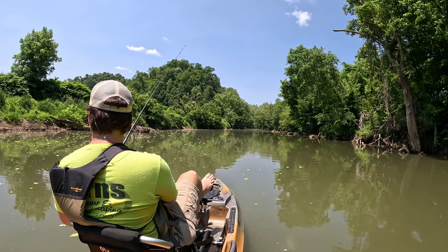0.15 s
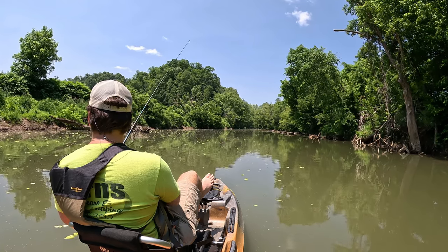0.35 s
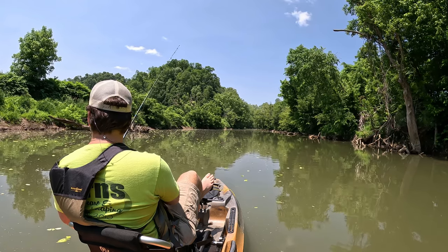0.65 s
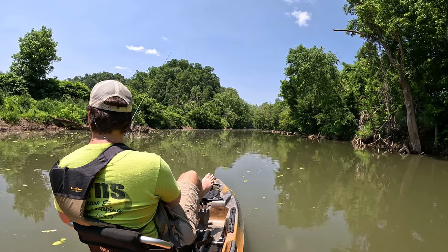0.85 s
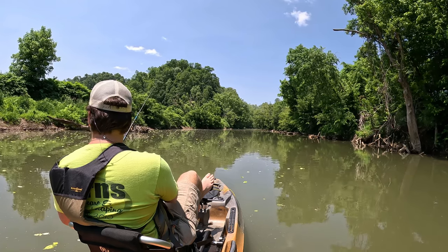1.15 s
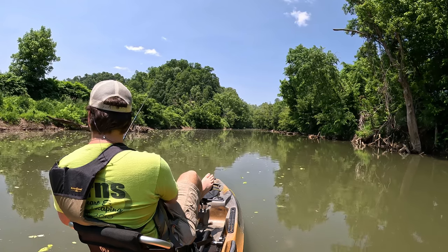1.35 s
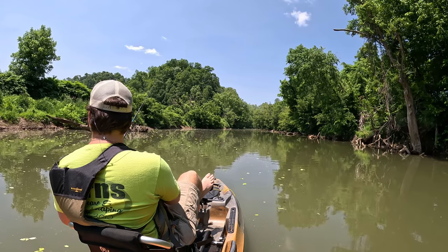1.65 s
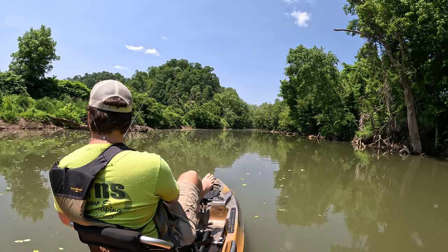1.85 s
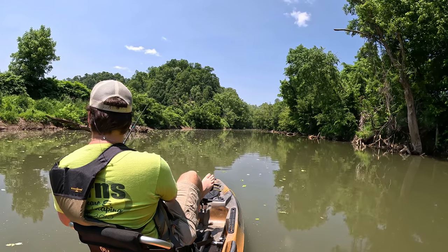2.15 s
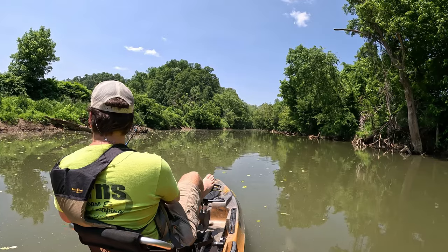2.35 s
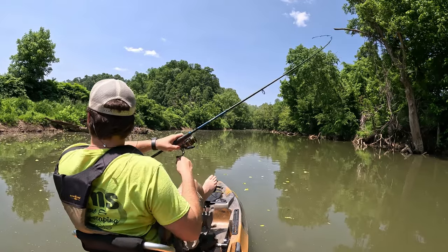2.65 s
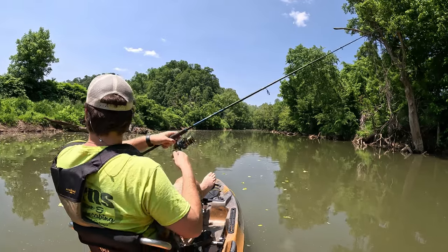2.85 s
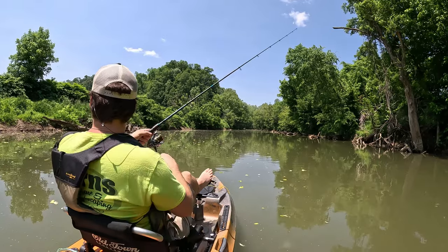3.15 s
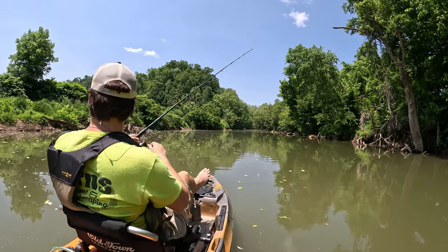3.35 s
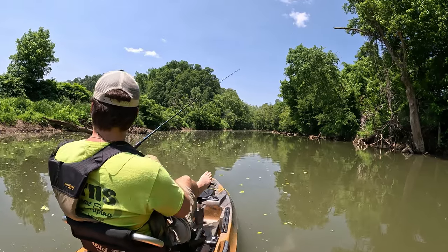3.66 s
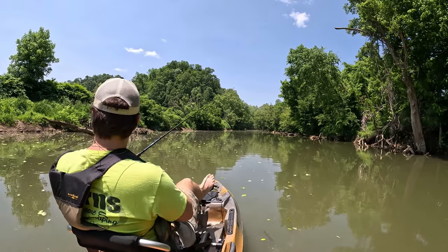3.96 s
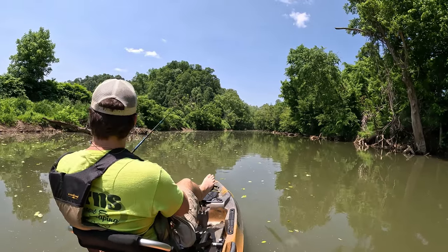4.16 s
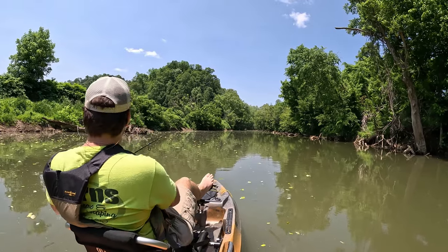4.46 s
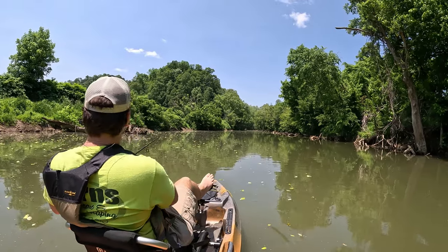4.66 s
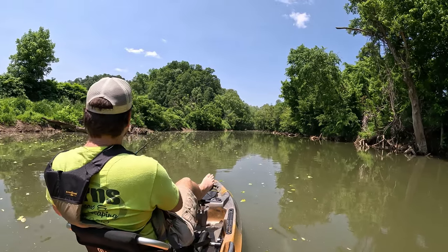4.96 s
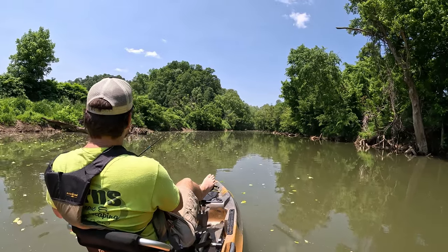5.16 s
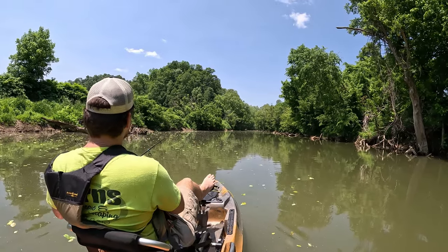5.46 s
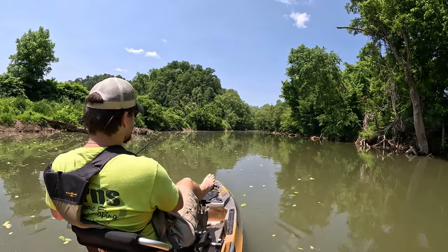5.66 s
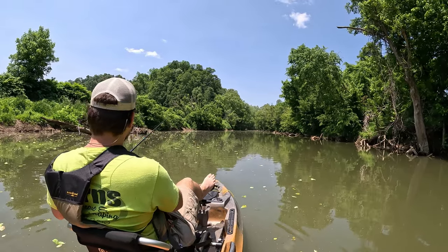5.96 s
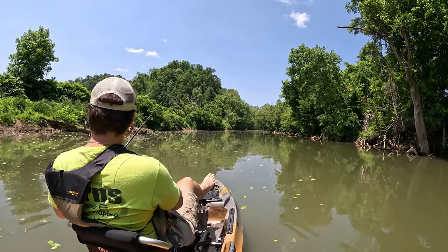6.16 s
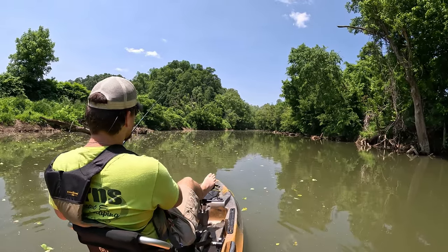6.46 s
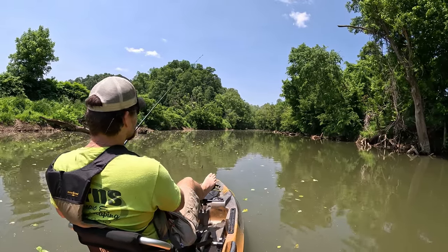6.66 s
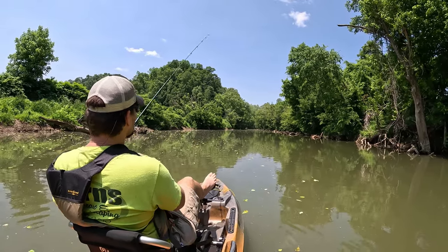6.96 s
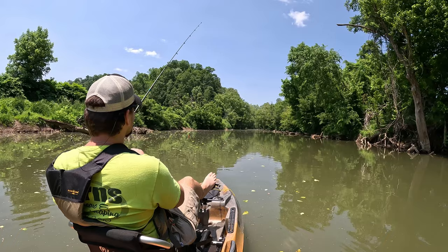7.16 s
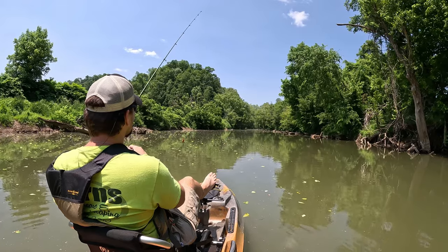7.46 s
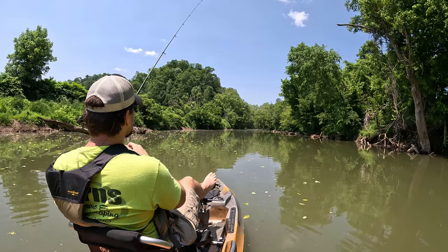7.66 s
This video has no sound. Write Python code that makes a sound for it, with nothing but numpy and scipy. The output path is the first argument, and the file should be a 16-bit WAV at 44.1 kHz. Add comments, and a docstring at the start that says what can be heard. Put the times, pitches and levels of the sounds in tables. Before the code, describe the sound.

Gear knocks and rattles on a hollow plastic kayak, with cloth rustling, one hard bang and faint birdsong.

```python
"""Fishing gear thuds and ticks on a hollow plastic kayak, heard from the hull behind the angler.
Blows ring the hull's low modes and the hardest one bounces; hard contacts snap and ring the deck shell.
As he shifts, cloth rubs and the seat creaks; the reel's gear teeth whir and its bail clicks.
Warblers sing in the trees, and the creek banks send back a short diffuse echo
over a hush of air and leaves."""
import sys
import numpy as np
from scipy import signal
from scipy.fft import rfft, irfft, next_fast_len
from scipy.io import wavfile
from scipy.ndimage import uniform_filter1d

SR = 44100
rng = np.random.default_rng(int(sys.argv[2]) if len(sys.argv) > 2 else 0)


def persist_wave(psi):
    """Save psi, clipped to +-1, as 16-bit WAV."""
    counts = np.round(np.clip(psi, -1, 1) * 32767).astype(np.int16)
    wavfile.write(sys.argv[1], SR, np.atleast_2d(counts).T)


N = 344408

# the angler shifting in his seat: start/s, strongest/s, end/s, cloth/dB, seat creak/dB
BODY_MOVES = [(2.36, 2.44, 2, -70, -110), (2.48, 2.64, 2.8, -49, -81.5), (2.8, 2.92, 3.22, -63.5, -83),
              (3.02, 3.12, 3.59, -62, -102), (3.46, 3.88, 4.18, -61.5, -116),
              (4.23, 4.46, 4.75, -60.5, -120), (4.85, 4.92, 5.17, -71.5, -122),
              (6.64, 6.76, 6.93, -86, -88.5)]


def undb(db):
    """Decibels to gain."""
    return 10 ** (np.asarray(db) / 20)


def unit(x):
    """Scale to rms 1."""
    return x / np.sqrt(np.mean(x ** 2))


def curve(table, column):
    """One column of a table, joined by straight lines in time."""
    rows = np.array(table)
    return np.interp(np.arange(N) / SR, rows[:, 0], rows[:, column])


def colour(x, points):
    """EQ through (f/Hz, gain/dB) points joined on a log axis."""
    size = next_fast_len(x.shape[-1])
    hz, db = np.transpose(points)
    bin_hz = np.arange(size // 2 + 1) * SR / size
    gain = undb(np.interp(np.log(bin_hz + 1), np.log(hz), db))
    return irfft(rfft(x, size) * gain, size)[..., :x.shape[-1]]


def ring(x, hz, t60):
    """One mode: a unit impulse starts a decaying sine of size 1."""
    r, w = np.exp(-np.log(1000) / (t60 * SR)), 2 * np.pi * hz / SR
    return signal.lfilter([0, r * np.sin(w)], [1, -2 * r * np.cos(w), r * r], x)


def walk(rate):
    """Smooth random drift, `rate` steps a second, rms 1."""
    hold = int(SR / rate)
    steps = np.repeat(rng.standard_normal(N // hold + 1), hold)
    return unit(uniform_filter1d(uniform_filter1d(steps, hold), hold)[:N])


def pair(like, length=N):
    """Stereo noise whose channels share the part `like` of their power."""
    mid, side = rng.standard_normal((2, length))
    return np.sqrt((1 + like) / 2) * mid + np.sqrt((1 - like) / 2) * side * np.array([[1], [-1]])


def add(out, s, x):
    """Mix a short sound in at time s."""
    i = int(s * SR)
    out[..., i:i + x.shape[-1]] += x[..., :max(N - i, 0)]


def grains(rate, scatter_db):
    """Dense random contacts, a few much larger than the rest; rms 1."""
    contacts = (rng.random(N) < rate / SR) * rng.choice([-1, 1], N)
    return unit(contacts * undb(scatter_db * np.minimum(rng.exponential(size=N), 5)))


def gestures(rows, column, edge_db=-10, roundness=2.84):
    """Level in dB of efforts that swell and ease off, silent between; more roundness flattens the top."""
    t, power = np.arange(N) / SR, 1e-20
    for row in rows:
        away = np.interp(t, row[:3], [1, 0, 1])
        power = power + (away < 1) * undb(row[column] + edge_db * away ** roundness) ** 2
    return 10 * np.log10(power)


def hush():
    """A bed of leaves and air; the bass laps and flickers on its own."""
    # ride of the bed: t/s, level/dB, bass swell/dB
    ride = [(0., -62.5, -2.5), (5., -63, 2), (6.5, -63.5, -4.5), (7.1, -67, 2), (7.81, -66.5, -1.5)]
    # spectrum of air and leaves: f/Hz, level/dB
    spectrum = [(25, -9), (90, -7), (170, -4), (260, -13.5), (420, -19.5), (850, -24), (1150, -17),
                (2300, -21), (4100, -25), (7000, -29), (10000, -39.5), (13000, -55), (16000, -54)]
    # stereo lean of the bed: f/Hz, left minus right/dB
    balance = [(60, -2), (200, -4.5), (700, -4), (2400, 1), (15000, -0.5)]
    hz, lean_db = np.transpose(balance)
    left, right = unit(colour(pair(0.57), spectrum))
    air = np.array([colour(left, np.c_[hz, lean_db / 2]), colour(right, np.c_[hz, -lean_db / 2])])
    bass = signal.sosfilt(signal.butter(2, 400, fs=SR, output="sos"), air)
    swell = undb(curve(ride, 2) + 1.1 * walk(5.6))
    return undb(curve(ride, 1) + 0.51 * walk(7.5)) * (air - bass + swell * bass)


def banks(x, t60, rise_ms, like):
    """Trunks and banks scatter a sound into a dense tail that builds, then dies."""
    t = np.arange(SR) / SR
    tail = pair(like, len(t)) * (1 - np.exp(-t / (rise_ms / 1000))) * np.exp(-np.log(1000) * t / t60)
    return signal.fftconvolve(x[None], tail / np.sqrt(np.sum(tail[0] ** 2)), axes=1)[:, :N]


def whistles(notes, warble):
    """Near-sine bird notes that glide through three pitches and waver a little."""
    out, waver = np.zeros(N), 1 + warble * walk(150)
    for s, length, *hz, db in notes:
        u = np.linspace(0, 1, int(length * SR))
        glide = np.polyval(np.polyfit([0, .5, 1], hz, 2), u)
        pitch = glide * waver[int(s * SR):][:len(u)]
        add(out, s, undb(db) * np.sin(np.pi * u) ** .5 * np.sin(2 * np.pi * np.cumsum(pitch) / SR))
    return out


def chatter(db=-66.5, low_hz=3930, high_hz=5720, fall_hz=1215, count=70):
    """Note list of short downward slurs, half hidden among the clear notes of the far song."""
    when, height, fall, softness = rng.random((count, 4)).T
    start_hz = low_hz + (high_hz - low_hz) * height
    end_hz = start_hz - fall_hz * (1 + fall) / 2
    middle_hz = (start_hz + end_hz) / 2
    return np.c_[.7 + 1.1 * when, np.full(count, .04), start_hz, middle_hz, end_hz, db - 6 * softness]


def warblers():
    """A far song and a near one a little to the right, both heard mostly by way of the trees."""
    # notes of the far song: t/s, length/s, start f/Hz, middle f/Hz, end f/Hz, level/dB
    far_notes = [(0.133, 0.045, 2230, 2490, 2700, -56.5), (0.551, 0.055, 2960, 2660, 2210, -58),
                 (.665, 0.03, 2880, 2660, 2080, -59.5), (0.728, 0.03, 3560, 3210, 2960, -61),
                 (0.799, 0.034, 3650, 3910, 4130, -55.5), (0.942, 0.038, 5000, 4800, 4730, -62),
                 (1.012, 0.088, 4820, 4270, 2860, -56.5), (1.15, 0.075, 3450, 3980, 3950, -54.5),
                 (1.215, 0.036, 3470, 3260, 2950, -59), (1.305, 0.0226, 3770, 3940, 4130, -53.5),
                 (1.422, 0.036, 5260, 4760, 4500, -57.5), (1.575, 0.023, 3940, 3880, 3530, -57),
                 (5.52, 0.12, 2905, 2800, 2490, -65), (4.762, 0.03, 6620, 5900, 4400, -54)]
    # notes of the near song: same columns
    near_notes = [(5.74, 0.031, 4100, 4500, 4670, -67.5), (6.39, 0.048, 6470, 7280, 8080, -64.5),
                  (6.424, 0.027, 7360, 6200, 5340, -57), (6.485, 0.12, 6200, 6990, 8400, -60.5),
                  (6.658, 0.037, 4820, 5130, 5580, -59.5), (6.743, 0.028, 4740, 4360, 3780, -55.5),
                  (6.788, 0.038, 4660, 5110, 5320, -63.5), (6.866, 0.0304, 6260, 6620, 6830, -60.5),
                  (6.903, 0.026, 6810, 4950, 3500, -60.5)]
    # the near bird's repeated motif: same columns, t/s from the motif's start
    motif = [(0., .04, 5800, 5150, 4634, 3.5), (0.042, 0.039, 5490, 6080, 6295, 3.5),
             (0.081, .055, 3870, 4378, 4676, 4)]
    # entries of the motif: t/s, level/dB
    entries = [(5.833, -66.5), (6.018, -61.5), (6.198, -62.5)]
    repeats = [(start + s, *note, db + entry_db) for start, entry_db in entries for s, *note, db in motif]
    near = whistles(near_notes + repeats, warble=.009)
    far = whistles(far_notes, warble=.014)
    near_song = undb(1.5) * near + undb(10) * banks(near, t60=.5, rise_ms=2.3, like=.88)
    hidden = whistles(chatter(), warble=.0071)
    far_song = .45 * far + banks(.5 * far + 1.1 * hidden, t60=.7, rise_ms=8, like=.5)
    return near_song * undb([[-1.2], [1.2]]) + far_song


def cloth():
    """Vest and shirt rub on the seat: fine crackle in a hiss."""
    # spectrum of rubbing fabric: f/Hz, level/dB
    spectrum = [(720, -12), (1120, 7.5), (2070, 5), (7640, -1.5), (10500, -15), (12500, -20.5),
                (16000, -52)]
    crackle = grains(rate=1500, scatter_db=2.8)
    rub = (0.5 * pair(0.79) + 0.6 * crackle) * undb(2.2 * walk(30))
    return undb(gestures(BODY_MOVES, column=3)) * unit(colour(rub, spectrum))


def reel(click_db=-17.5, rasp_db=-27):
    """Gear teeth rasp and ring the reel body, each mode wavering; bail clicks strike the same modes."""
    # turns of the handle: start/s, strongest/s, end/s, whir/dB, tilt/(dB per octave)
    turns = [(3.457, 3.924, 4.13, -83.5, 3.5), (4.245, 4.325, 4.42, -74, -11),
             (4.568, 4.625, 4.69, -85.5, 6)]
    # clicks of the bail: t/s, level/dB, decay/ms, tilt/(dB per octave)
    clicks = [(2.883, -42, 1.5, -5), (4.0801, -50.5, 4.7, -5), (4.6448, -45, 6.7, -0.5),
              (4.887, -53, 14, -1), (4.922, -60, 10, -5)]
    # modes of the reel body: f/Hz, level/dB, t60/s
    modes = [(1350, -6, .05), (1540, 1, .055), (1760, -1, .05), (2270, -4, .035), (3030, -7, .05),
             (3290, -8, .045), (5040, -13, .03)]
    starts, tilts = np.array(turns)[:, [0, 4]].T
    current_turn = np.maximum(np.searchsorted(starts, np.arange(N) / SR) - 1, 0)
    tilt = tilts[current_turn]
    whir_db = gestures(turns, column=3, edge_db=-14, roundness=1.6)
    teeth = undb(whir_db) * grains(rate=1200, scatter_db=2.5)
    strikes, t = np.zeros((len(modes), N)), np.arange(SR // 50) / SR
    octaves = np.log2(np.array(modes)[:, :1] / 1540)
    for s, db, decay_ms, click_tilt in clicks:
        burst = np.exp(-t / (decay_ms / 1000)) * rng.standard_normal(len(t))
        add(strikes, s, undb(db + click_db + click_tilt * octaves) * burst)
    rasp = undb(rasp_db + 0.9 * tilt) * teeth  # brighter turns rasp more
    body = colour(rasp, [(900, -27), (1300, 3), (3500, -3), (9000, -4), (13000, -39)])
    for (hz, db, t60), strike, octave in zip(modes, strikes, octaves):
        flicker_db, sway_samples = 4 * walk(30), .0002 * SR * walk(20)
        whir = ring(teeth * undb(flicker_db + tilt * octave), hz, t60)
        wavering = np.interp(np.arange(N) + sway_samples, np.arange(N), whir)
        body += undb(db) * (ring(strike, hz, t60) + wavering)
    return colour(body, [(800, -47), (1250, 1)])  # a small body radiates no bass


def gear_ticks(mid_db=1.5, top_db=11.5, shell_db=-27, snap_db=10.5,
               mid_ms=2.97, top_ms=1.9, scrape_ms=4.4, tail_ms=54, spread_ms=2):
    """Hard contacts in three layers: a chirped snap, a crack with a rattling tail, a ringing deck."""
    # gear hitting the deck: t/s, mids/dB, treble/dB, shell/dB
    contacts = [(2.4135, -31, -47.5, -53), (2.46, -32.5, -59, -46), (2.511, -39.5, -51, -58),
                (2.6357, -23.5, -62, -42), (2.7338, -26, -45.5, -38), (2.773, -24, -43, -32.5),
                (2.836, -20.5, -44.5, -28), (2.8617, -42, -70, -54), (2.884, -38, -50.5, -62),
                (3.038, -48.5, -74, -61), (3.088, -39.5, -58, -55.5), (3.1551, -26.5, -58, -44.5),
                (3.3826, -35, -62, -43.5), (3.619, -42, -63, -52), (3.833, -46, -60, -57.5),
                (3.9012, -40, -60, -52.5), (4.0803, -48, -66, -79), (4.2527, -40.5, -60, -50.5),
                (4.4658, -28.5, -47.5, -51), (4.6469, -39.5, -46.5, -61.5), (4.889, -68, -53.5, -76),
                (4.926, -60, -57, -79), (4.988, -67, -61.5, -85), (5.088, -58, -65, -80),
                (5.334, -70, -64, -80), (6.5608, -9, -19, -17.5)]
    # spectrum of the treble crack: f/Hz, level/dB
    top_band = [(2000, -22), (3000, -10), (4500, 1.5), (6200, 1.5), (9700, -6.5), (11100, -18),
                (14000, -23.5), (16000, -63)]
    # modes of the deck shell: f/Hz, level/dB, t60/s
    shell_modes = [(531.6, -5, 0.06), (604.7, 2.5, 0.038), (651, -3.5, 0.049), (709.4, -2.5, 0.071),
                   (799, -4, .08), (941, -7, 0.055), (1510, -13, 0.06)]
    mid_band = [(500, -48.5), (900, 6), (3200, -3), (4800, -35)]
    t = np.arange(SR // 4) / SR
    rattle = undb(-25.5) * np.exp(-t / (tail_ms / 1000))
    mid_env = np.exp(-t / (mid_ms / 1000)) * (1 - np.exp(-t / .00072)) + rattle
    top_env = np.exp(-t / (top_ms / 1000)) * (1 - np.exp(-t / .00046)) + rattle
    scrape_env = np.exp(-t / (scrape_ms / 1000)) + undb(-16.5) * np.exp(-t / .04)
    # bending waves run as the root of frequency: the delay is spread_ms at 1 kHz, less above
    bin_hz = np.arange(len(t) // 2 + 1) * SR / len(t)
    chirp = undb(snap_db) * irfft(np.exp(-4j * np.pi * spread_ms / 1000 * np.sqrt(1000 * bin_hz)), len(t))
    mid_snap, top_snap = np.zeros((2, N))
    mid_crack, top_crack, scrape = np.zeros((3, 2, N))
    for s, db, treble_db, knock_db in contacts:
        onset, mid_gain, top_gain = s - .001, undb(db + mid_db), undb(treble_db + top_db)
        add(mid_snap, onset, mid_gain * chirp)
        add(top_snap, onset, top_gain * chirp)
        add(mid_crack, onset, mid_gain * mid_env * pair(0.93, len(t)))
        add(top_crack, onset, top_gain * top_env * pair(0.91, len(t)))
        add(scrape, s, undb(knock_db + shell_db) * scrape_env * pair(0.89, len(t)))
    snap = colour(mid_snap, mid_band) + colour(top_snap, top_band)
    crack = colour(mid_crack, mid_band) + colour(top_crack, top_band)
    deck = sum(undb(db) * ring(scrape, hz, t60) for hz, db, t60 in shell_modes)
    deck += colour(scrape, [(250, -13), (450, 29.5), (900, 17), (1600, -8)])
    return snap, crack, deck


def hull_blows(drop_s=6.564, drop_db=-13.5, bounce_gap_s=.019):
    """Cue list of blows on the hull; the hardest bounces, weaker and thinner each time."""
    # gear thudding on the hull: t/s, level/dB, tilt/(dB per octave), set by where the blow lands
    thuds = [(0.571, -44, 9), (2.418, -35.5, -10), (2.464, -31.5, 6.5), (2.633, -26, -0.5),
             (2.66, -24.5, 2), (2.735, -28.5, 0), (2.773, -24, -8), (2.848, -19.5, -3.5), (2.989, -50, -28),
             (3.158, -37, -5), (3.293, -43.5, -15.5), (3.383, -31, 5), (3.4, -36, 3.5), (3.62, -38, -3),
             (3.895, -38.5, -3), (4.255, -38.5, 5), (4.485, -47, -19.5), (6.632, -31, -9),
             (6.967, -47.5, -1)]
    return thuds + [(drop_s + k * bounce_gap_s, drop_db - .7 * k * k, 1.5 + 2 * k) for k in range(4)]


def hull(push_db=-13.5, contact_ms=2.6, rattle_db=-38.5, rattle_ms=29.7, travel_ms=14):
    """Soft blows, loose gear and the creak of the seat ring the hollow hull."""
    # modes of the hull: f/Hz, level/dB, t60/s, left minus right/dB
    modes = [(36, -18, 0.3, -4.5), (83, -12, 0.25, 9), (96, -11, .36, 4), (107, -6, 0.3, 2),
             (136.65, -8, 0.22, 11.5), (163.7, -5, 0.22, 4), (192, 4, 0.18, 0), (241, -4, 0.088, -12),
             (275, -3, 0.15, -6), (315.2, -6, 0.14, -2), (374.6, -3, 0.047, 6), (430, -7, 0.078, -9.5)]
    blows, sides = hull_blows(), np.array([[1], [-1]])
    spots = rng.standard_normal((len(blows), len(modes), 2))  # each spot couples to each mode its own way
    push = np.hanning(int(contact_ms * SR / 1000) + 2)
    push /= push.sum()
    creak = undb(gestures(BODY_MOVES, column=4)) * pair(0.82)
    t = np.arange(SR // 3) / SR
    rattle, out = np.zeros((2, 2, N))
    for s, blow_db, _ in blows:  # loose gear shakes on after each blow
        add(rattle, s, undb(blow_db + rattle_db) * np.exp(-t / (rattle_ms / 1000)) * pair(0.44, len(t)))
    for k, (hz, db, t60, pan_db) in enumerate(modes):
        force = rattle + creak * undb(-11 * np.log2(hz / 190))  # the seat mostly rocks the whole hull
        lag_s = travel_ms / 1000 * (np.sqrt(400 / hz) - 1.3)  # bending waves bring the bass late
        octave = np.log2(max(hz, 90) / 190)  # under 90 Hz the hull moves as one, wherever it is hit
        for (s, blow_db, tilt), (coupling, lean) in zip(blows, spots[:, k]):
            strength = undb(blow_db + push_db + tilt * octave + 1.5 * coupling)
            add(force, s + lag_s, strength * (1 + .2 * lean * sides) * push)
        out += undb(db + sides * pan_db / 2) * (-1) ** k * ring(force, hz, t60)
    return out


def scene():
    """The boat up close, its snaps echoing off the banks, with birds and hush behind."""
    snap, crack, deck = gear_ticks()
    gear = (snap + crack + deck + reel()) * undb([[-.4], [.4]])
    echo_send = colour(snap, [(400, -9.5), (1500, 1.5), (8000, -.5), (14000, -1)])
    echo = undb(-9) * banks(echo_send, t60=.48, rise_ms=44, like=.65)
    return gear + echo + warblers() + hull() + cloth() + hush()


def record(dry):
    """The microphone cuts the top steeply above 15.8 kHz."""
    return signal.sosfilt(signal.ellip(8, .2, 70, 15800, fs=SR, output="sos"), dry)


dry = scene()
out = record(dry)
persist_wave(out)
```